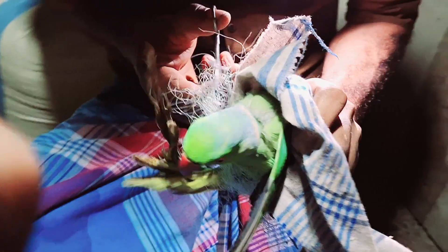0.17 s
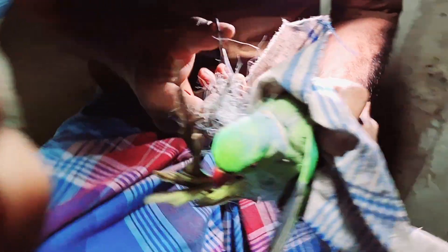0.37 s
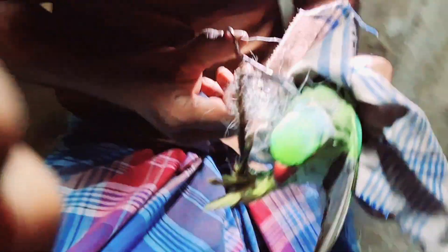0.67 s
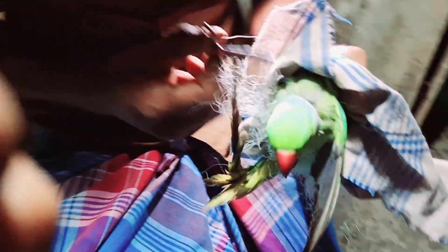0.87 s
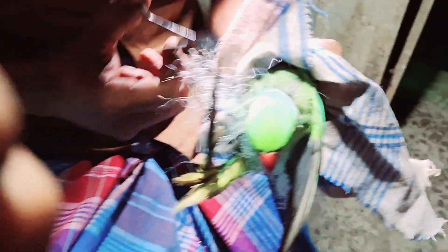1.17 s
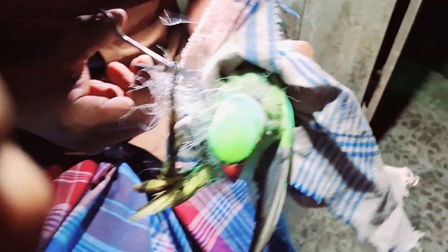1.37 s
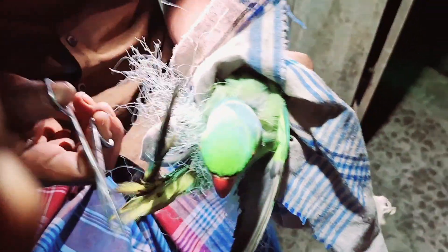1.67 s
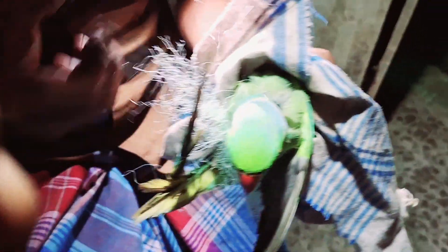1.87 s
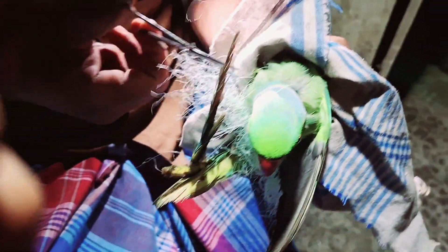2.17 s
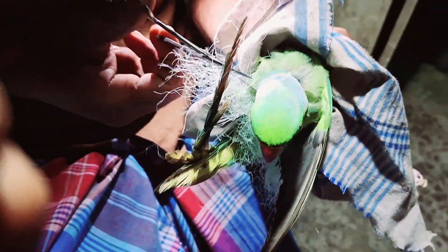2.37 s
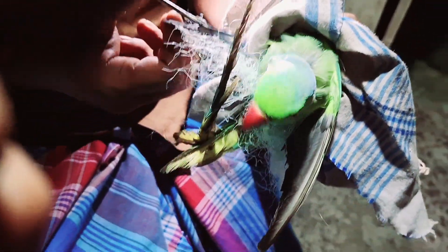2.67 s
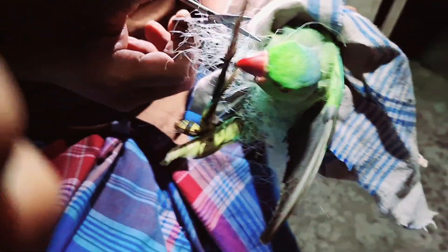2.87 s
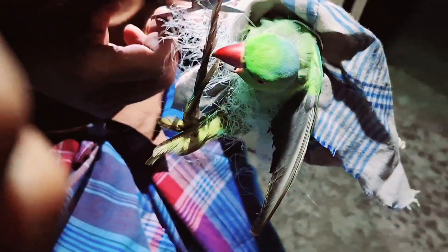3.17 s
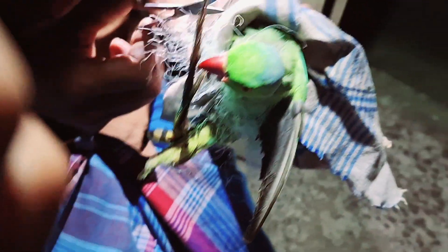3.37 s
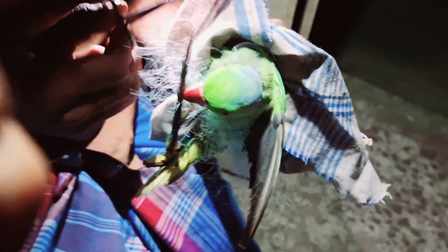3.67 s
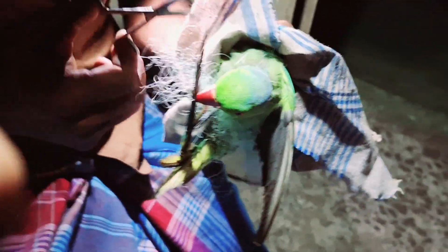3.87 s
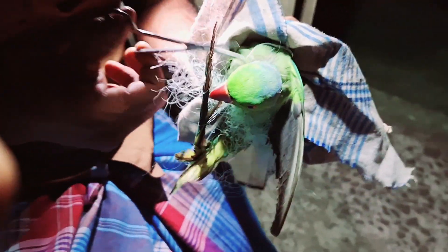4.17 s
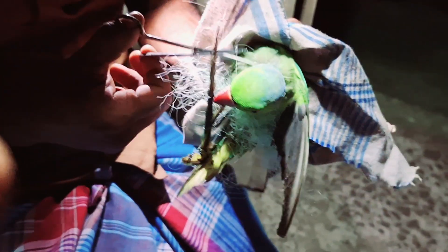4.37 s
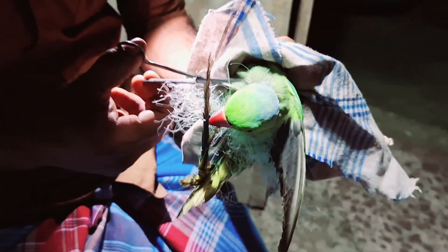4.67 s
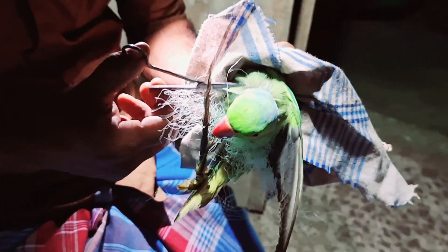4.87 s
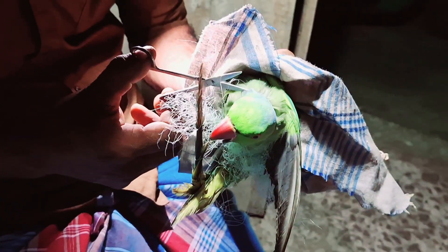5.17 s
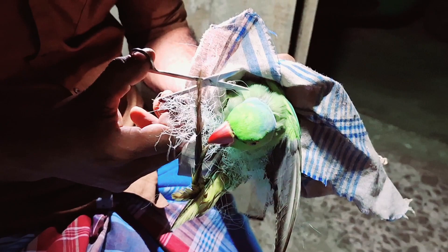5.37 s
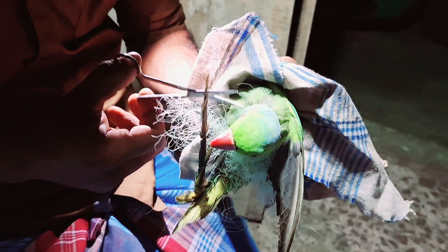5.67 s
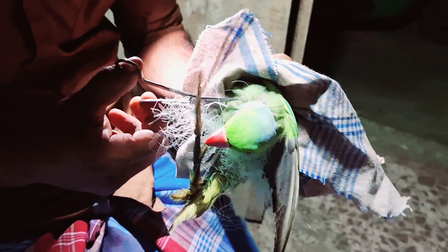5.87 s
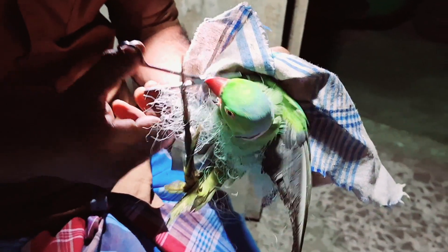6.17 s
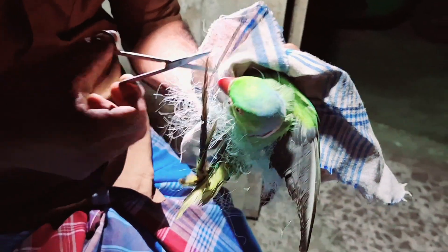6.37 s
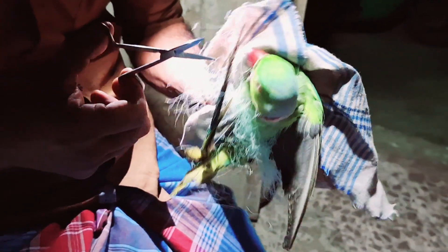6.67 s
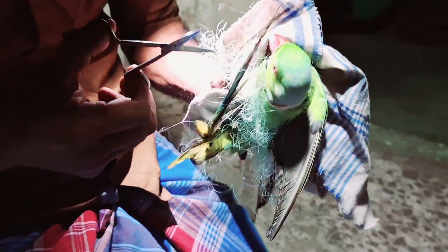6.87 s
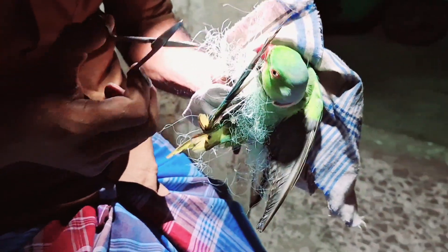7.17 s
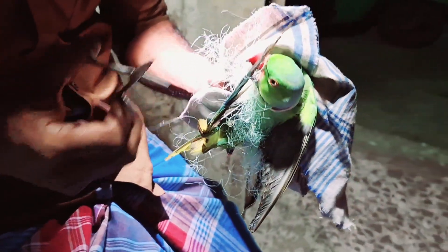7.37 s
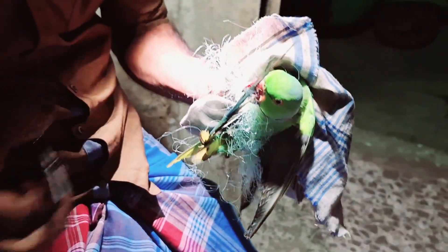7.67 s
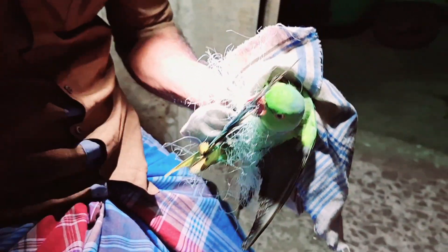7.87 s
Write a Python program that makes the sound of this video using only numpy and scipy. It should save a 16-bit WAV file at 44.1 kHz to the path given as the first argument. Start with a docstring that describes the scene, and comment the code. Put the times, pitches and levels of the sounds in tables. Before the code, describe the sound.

A hand-held parakeet screeches harshly eight times, loud and buzzing, over faint night crickets, a piping frog and a far engine.

```python
"""Outdoors at night, near walls that give a short echo, a parakeet held close to a phone screeches eight times.
Its voice organ, the syrinx, buzzes near 1 kHz in bursts of a few cycles, about 95 bursts a second.
Clicks and puffs of air make the buzz; resonances of throat and beak colour it.
Behind it are crickets (ringing bands), a piping frog (sliding sine notes), cloth rustles, low thumps and
a knock (noise ticks) and a far engine (low noise and wavering tones)."""
import sys
import numpy as np
from scipy import signal
from scipy.fft import rfft, irfft
from scipy.io import wavfile
from scipy.ndimage import uniform_filter1d, minimum_filter1d

SR = 44100
rng = np.random.default_rng(int(sys.argv[2]) if len(sys.argv) > 2 else 0)


def wav_record(signal):
    """Record a signal, one row per channel, as 16-bit PCM in the file named by sys.argv[1]."""
    frames = np.transpose(np.atleast_2d(signal))
    bounded = np.clip(frames, -1, 1)
    # unit amplitude maps onto the largest positive 16-bit level
    quanta = np.round(bounded * 32767).astype(np.int16)
    wavfile.write(sys.argv[1], SR, quanta)


def linear_from_db(decibels):
    """Turn decibels (scalar or array-like) into linear amplitude factors; 0 gives 1."""
    return 10 ** (np.asarray(decibels, float) / 20)


N = 353285
T = np.arange(N) / SR  # time in seconds

# Effort of the bird, one list a screech. Each row: time in seconds, level in dB, pitch in Hz.
SCREECH_EFFORT = [
    [(0.0, -37, 1130), (0.006, -24, 1096), (0.03, -24.5, 1045), (0.314, -26.5, 964), (0.444, -40, 897),
     (0.47, -56, 848)],
    [(2.63, -37, 930), (2.654, -28, 1062), (2.75, -28, 1048), (2.98, -28, 1006), (3.178, -37.5, 907),
     (3.235, -55, 891)],
    [(3.562, -34.5, 962), (3.626, -30, 1044), (3.77, -28, 984), (3.94, -30, 948), (4.066, -42.5, 902),
     (4.09, -55, 863)],
    [(4.43, -27.5, 927), (4.44, -39, 1035), (4.474, -28.5, 1015), (4.55, -26, 1026), (4.832, -29.5, 907),
     (4.948, -49, 822)],
    [(5.322, -28.5, 1040), (5.392, -27, 1029), (5.532, -27.5, 1027), (5.632, -25.5, 960), (5.88, -38, 926),
     (5.902, -46.5, 910)],
    [(6.138, -28, 1013), (6.174, -30.5, 1162), (6.374, -27, 1042), (6.586, -30.5, 938), (6.6, -38, 926)],
    [(6.87, -32, 996), (6.918, -29, 1100), (7.15, -26, 1026), (7.262, -28, 950), (7.346, -42.5, 876),
     (7.362, -53, 900)],
    [(7.73, -39, 1086), (7.768, -40.5, 1080), (7.774, -32.5, 1036), (7.878, -27.5, 976), (8.0, -27.5, 951),
     (8.01, -24, 945)],
]
# Timing of the bursts, one row a screech. Each row: first burst in seconds, number of gaps between bursts,
# gap in ms at the start, in the middle and at the end.
BURST_TIMING = [(.0084, 44, 10.75, 10.42, 9.9), (2.6257, 59, 10.64, 10.15, 10.09),
                (3.5662, 49, 11.4, 10.5, 10.51), (4.4313, 46, 11.07, 11.12, 11.42),
                (5.3223, 54, 11.29, 10.54, 10.71), (6.1416, 43, 10.68, 10.65, 10.43),
                (6.8728, 46, 11.02, 10.42, 10.73), (7.7297, 24, 12.02, 11.54, 11.7)]
# Head and beak pose, one row a screech. Each row: stretch of the resonances (a factor), left minus right
# in dB, open beak in dB, bright group in dB, lift of the second and of the fourth resonance in dB.
HEAD_POSE = [(.96, 8.8, -3, -3.5, -1, -5.5), (1.005, 12.6, -1, -7.5, -0.5, -0.5),
             (1.01, 8.5, -5, -7, 1.5, 0), (1, 5.4, -3.5, 0.5, 0, 1.3), (1.002, 5.25, -4, -0.5, -0.5, 0.5),
             (1.03, 5, -0.5, -3.5, 1, -1.8), (1.047, 4.7, -1, -11.5, 2, -1),
             (1.014, 6.6, -3.5, -6.5, 1, 1.3)]
# Voice, one row a screech. Each row: length of the bursts (a factor), fundamental in dB, air in dB.
VOICE_SETTINGS = [(1.08, -8.5, -7), (1.04, -6.5, -4.5), (1.07, -7.5, -9.5), (1.09, -6, -3), (1.1, -8, -2),
                  (1.2, -4.5, -3.5), (1.28, -5, -7.5), (1.1, -8, -11)]
# Resonances of the windpipe, of the throat and beak, of the hissing air and of the pumped air.
# Each row: centre in Hz, half width in Hz, level in dB within its group.
WINDPIPE_MODES = [(960, 700, 0)]
THROAT_BEAK_MODES = [(1560, 240, -0.5), (2200, 490, -5), (3165, 337, -2.46), (4106, 684, 0),
                     (4846, 886, -2.9), (6044, 730, -0.6), (7475, 714, 0)]
AIR_MODES = [(11040, 750, -1), (13000, 9800, -9.5), (16300, 2800, -2.5)]
PUMP_MODES = [(397, 171, 1)]
# Echoes off hands and cloth. Each row: delay in ms, gain at the left port, gain at the right port.
HAND_ECHOES = [(.37, 0.19, 0.17), (.7, -0.13, -0.083), (1.1, -0.13, -0.15), (1.701, 0.057, -0.12),
               (2.4, 0.013, -0.18)]
# Frog pipes. Each row: time of the swell's peak in seconds, level in dB.
FROG_PIPES = [(.8, -65), (1.12, -61), (1.54, -62), (1.87, -59), (2.19, -55), (2.551, -55), (3.301, -62),
              (4.39, -57.5), (5.19, -58.5), (5.95, -60), (6.671, -61)]
# Cloth rustles, low thumps (240 to 350 Hz) and a knock (1520 Hz). Each row: start in seconds,
# length in seconds, level in dB before fading, centre in Hz, width in Hz.
RUSTLES_AND_THUMPS = [(0.661, 0.067, -58.5, 2820, 3600), (0.896, 0.11, -58, 2300, 3500),
                      (.9, 0.083, -66, 297, 300), (1.367, .07, -59, 2300, 3000),
                      (1.37, 0.045, -67, 240, 150), (1.485, 0.088, -58, 2600, 3000),
                      (1.501, .03, -54.5, 1520, 400), (1.706, 0.0034, -60, 2000, 4000),
                      (1.701, 0.035, -65.5, 350, 200), (1.72, .4, -79, 595, 700)]
# Crickets. Each row: centre in Hz, width in Hz, average strokes per second, blur from 0 to 1,
# level in dB before the swells.
CRICKET_BANDS = [ (3810, 230, 82, .3, -66), (7700, 400, 70, .9, -77), (6180, 280, 55, 1, -69.5),
                 (13300, 1200, 240, .5, -72)]
# Colour of the night air. Each row: frequency in Hz, relative level in dB per Hz.
NIGHT_COLOUR = [(90, -35.5), (150, -18.5), (360, -20), (1000, -25), (2400, -24.5), (3800, -25), (4500, -27),
                (6000, -20), (7000, -43.5), (7700, -20.5), (9500, -51), (12000, -16.5), (15500, -22)]
# Swell of the crickets and night air together. Each row: time in seconds, change in dB.
CHORUS_SWELL = [(0, -2.5), (.6, -1), (1.3, -3), (2.1, 3.5), (2.6, 2), (3.4, -5), (4.3, -1.5), (5.1, 0),
                (6, -2.5), (6.8, -0.5), (7.6, 0), (8, 1)]
# Rise and fall of the far engine's rumble. Each row: time in seconds, relative level in dB.
ENGINE_LEVEL = [(0.0, -57), (0.64, -64.5), (1.89, -58.5), (1.92, -53), (3.19, -70), (4.44, -61),
                (4.46, -57.5), (6.56, -56.5), (6.72, -64), (7.27, -57.5), (7.61, -69), (8.01, -57)]
# Colour of that rumble. Each row: frequency in Hz, relative level in dB per Hz.
RUMBLE_COLOUR = [(25, -25), (45, 0), (70, 2.5), (110, 0.5), (150, -19.5), (300, -30), (600, -39.5)]
# Firing tone of the far engine. Each row: time in seconds, average frequency in Hz, level in dB.
FIRING_TONE = [(4.1, 37.5, -97), (4.5, 37.5, -66), (5.8, 37.66, -62.5), (6.5, 39.5, -58), (7, 41.15, -64),
               (8, 42.7, -63.5)]
# Overtones of the engine. Each row: multiple of the firing tone, average level in dB against it.
ENGINE_OVERTONES = [(1, -11), (2, 0), (3, -2)]

# random spread of the slaps: timing in cycles, pitch as a share, loudness in dB
CYCLE_JITTER, PITCH_SCATTER, SIZE_DB = .024, .014, 1.2
BURST_JITTER_MS, BURST_DB = .06, .5  # random spread from burst to burst
RISE_MS, FALL_MS = 1.163, 1.47  # swell and fade of a burst, before the voice's length factor
SAG = .033  # how fast the cycles spread out within a burst
SCOOP, SCOOP_MS = .28, 14  # share of pitch missing as a call begins, and how fast it is made up
EARLY_MS, FIRST_LATE_MS = .7, 1.5
LEAK_MS, LEAK_DB = 4.5, -8  # air that leaks before the membranes catch
RASP, PUMP_RASP = .2, .12  # share of air puffs in the buzz and in the pumped air
THROAT_DB, PUMP_DB = 5, -26  # throat group; pumped air against the fundamental
# dB lost by each group per dB of lost effort; the fundamental holds on and gives way only at the end
BEAK_SHARE, BRIGHT_SHARE, AIR_SHARE, LOW_SHARE, LOW_BEND_PER_DB = 0.68, 1.1, 1.24, 0.18, 0.015
# the treble tires during a call
BRIGHT_DB_PER_S, AIR_DB_PER_S, BEAK_DB_PER_S = -9, -1, -1.5
LEAD = 4  # samples by which the bird reaches the left port first
WALL_DB, WALL_T60_S, WALL_GAP_MS = -11, 0.19, 3.4  # echo level, time to fade by 60 dB, wait
FROG_HZ, FROG_SLIDE_HZ, FROG_MS = 3400, 49.3, 16.6  # final pitch, half the full slide, note width
NIGHT_DB = -63  # before the swells
TOP_HZ, LEFT_DB = 15800, .6  # treble limit; left minus right
CEILING, LOOK_AHEAD = .9, 131  # limiter: highest peak, samples of warning


def parakeet():
    """All calls in place; the left port is nearer the bird, so sound reaches the right port later."""
    out = np.zeros((2, N))
    for call in zip(SCREECH_EFFORT, BURST_TIMING, HEAD_POSE, VOICE_SETTINGS):
        at, both = screech(*call)
        out[:, at:at + both.shape[1]] += both
    out[1] = np.roll(out[1], LEAD)
    return out


def screech(rows, bursts, pose, voice):
    """One call: the buzz through groups of resonances; the head shades the treble of the right port."""
    s, effort_db, pitch_hz = np.transpose(rows)
    stretch, pan_db, beak_db, bright_db, second_db, fourth_db = pose
    hold, low_db, air_db = voice
    t = T[max(int((s[0] - .02) * SR), 0):int((s[-1] + .05) * SR)]
    age = t - s[0]
    peak_db = effort_db.max()
    lost = peak_db - np.interp(t, s, effort_db)

    slaps, puffs = syrinx(t, s, pitch_hz, bursts, hold)
    leaking = np.abs(age + LEAK_MS / 2000) < LEAK_MS / 2000
    leak = leaking * rng.standard_normal(len(t)) * np.std(slaps) * linear_from_db(LEAK_DB)
    buzz = slaps + RASP * puffs[0] + leak

    lift = (0, second_db, 0, fourth_db, 0, 0, 0)
    tract = [(hz * stretch, w, db + up) for (hz, w, db), up in zip(THROAT_BEAK_MODES, lift)]
    # each group moves with effort and age
    low_db = peak_db + low_db - LOW_SHARE * lost - LOW_BEND_PER_DB * lost ** 2
    beak_db = peak_db + beak_db - BEAK_SHARE * lost + BEAK_DB_PER_S * age
    bright_db = peak_db + bright_db - BRIGHT_SHARE * lost + BRIGHT_DB_PER_S * age
    air_db = peak_db + air_db - AIR_SHARE * lost + AIR_DB_PER_S * age

    # little sounds under the fundamental but the air pumped by each burst
    low = resonances(slaps, WINDPIPE_MODES, low_db) - resonances(buzz, tract[:3], beak_db)
    low = signal.sosfiltfilt(signal.butter(5, 630, "high", fs=SR, output="sos"), low)
    low = low + resonances(slaps + PUMP_RASP * puffs[1], PUMP_MODES, low_db + PUMP_DB)
    throat = resonances(buzz, tract[3:6], peak_db + THROAT_DB - lost)
    high = throat - resonances(buzz, tract[6:], bright_db)
    # the topmost hiss is turbulence, partly unrelated at the two ports
    air = resonances(slaps + .9 * puffs, AIR_MODES, air_db)
    pan = linear_from_db(np.array([[pan_db], [-pan_db]]) / 2)
    return int(round(t[0] * SR)), low + pan * high + air


def syrinx(t, s, pitch_hz, bursts, hold):
    """Membrane slaps: each burst swells and dies within a few cycles; a puff of air rides each slap."""
    centre = burst_times(*bursts)
    cycle = np.arange(-4, 7)
    chance = rng.standard_normal((len(centre), 4 + 2 * len(cycle)))
    pitch_luck, cycle_luck, time_luck, loud_luck = chance[:, :4].T[:, :, None]
    wobble, size = np.split(chance[:, 4:], 2, axis=1)
    # the voice scoops up as the membranes tighten, unless the call is already under way
    slack = SCOOP * np.exp((s[0] - centre) * 1000 / SCOOP_MS) * (s[0] > 0)
    hz = np.interp(centre, s, pitch_hz) * (1 - slack)
    period = (1 + PITCH_SCATTER * pitch_luck) / hz[:, None]
    # the pitch sags within a burst, which widens every overtone
    late = (cycle + SAG * cycle ** 2 + 0.13 * cycle_luck + CYCLE_JITTER * wobble) * period
    swell_ms = hold * np.where(late < 0, RISE_MS, FALL_MS)
    shape = np.exp(-.5 * np.abs(late * 1000 / swell_ms) ** 2.4)
    # slack membranes slap more softly
    shape = shape * linear_from_db(-25 * slack[:, None] + BURST_DB * loud_luck)
    strength = (shape * linear_from_db(SIZE_DB * size)).ravel()
    start = centre[:, None] - t[0] + (BURST_JITTER_MS * time_luck - EARLY_MS) / 1000

    # place each click between samples with a short smooth pulse
    at = (start + late).ravel() * SR
    tap = np.floor(at)[:, None] + np.arange(-7, 9)
    away = tap - at[:, None]
    click = np.sinc(away) * np.cos(np.pi * away / 16) ** 2
    slaps = np.zeros(len(t))
    np.add.at(slaps, np.clip(tap, 0, len(t) - 1).astype(int), click * strength[:, None])
    puffs = uniform_filter1d(np.abs(slaps), size=30) * rng.standard_normal((2, len(t)))
    return slaps, level(puffs, 0) * np.std(slaps)


def burst_times(first, gaps, *gap_ms):
    """The gap between bursts drifts smoothly; the first burst of a fresh call comes a little late."""
    gap = np.polyfit([0, gaps / 2, gaps], gap_ms, deg=len(gap_ms) - 1)
    k = np.arange(gaps + 1)
    late_ms = FIRST_LATE_MS * (k == 0) * (first > .1)
    return first + (np.polyval(np.polyint(gap), k) + late_ms) / 1000


def resonances(x, modes, db):
    """Resonances side by side with alternating sign, at a level that may move."""
    y = 0
    for k, (hz, half, mode_db) in enumerate(modes):
        y = y + (-1) ** k * linear_from_db(mode_db) * ring(ring(x, hz, 2 * half), hz, 2 * half)
    return level(y, 0) * linear_from_db(db)


def hands(bird):
    """Close echoes smear each slap and cut fixed notches, different at each port."""
    out = bird
    for ms, left, right in HAND_ECHOES:
        out = out + np.array([[left], [right]]) * np.roll(bird, int(ms * SR / 1000), axis=1)
    return out


def walls(bird):
    """A short scatter of echoes that dies away, different at each port."""
    t = np.arange(int(.5 * SR)) / SR
    tail = rng.standard_normal((2, len(t))) * linear_from_db(-60 * t / WALL_T60_S) * (t > WALL_GAP_MS / 1000)
    tail = ring(ring(tail, 3200, 7000), 3200, 7000)
    tail = tail / np.sqrt(np.sum(tail ** 2, axis=1, keepdims=True))
    mono = bird.mean(axis=0, keepdims=True)
    return linear_from_db(WALL_DB) * signal.fftconvolve(mono, tail, axes=1)[:, :N]


def frog():
    """Short pure notes that slide up, level off and end in a fainter pulse."""
    out = np.zeros(N)
    for s, db in FROG_PIPES:
        t = (T - s) * 1000 / FROG_MS
        hz = FROG_HZ + FROG_SLIDE_HZ * (np.tanh(t + 1.1) - 1)
        swell = np.exp(-.5 * t ** 2) + 0.23 * np.exp(-.5 * (t - 2.2) ** 2)
        out += linear_from_db(db) * swell * np.sin(2 * np.pi * np.cumsum(hz) / SR)
    return out


def rustles_and_thumps():
    """Dense noise ticks of uneven size, swelling and fading: cloth rustles, low thumps and a knock."""
    out = 0
    for s, length, db, hz, width in RUSTLES_AND_THUMPS:
        size_db = 3.5 * np.minimum(rng.exponential(size=N), 4)
        ticks = rng.standard_normal((3, N)) * linear_from_db(size_db)
        # one shared noise plus one of its own for each port
        ticks = level(ring(ticks[0] + .8 * ticks[1:], hz, width), db)
        u = np.clip((T - s) / length, 0, None)
        out = out + ticks * (1 - np.exp(-u / 0.065)) * np.exp(-u ** 2)
    return out


def crickets():
    """Wing strokes ring a narrow band; many unseen insects blur each band with noise."""
    out = 0
    for hz, width, rate, blur, db in CRICKET_BANDS:
        drift = 1 + 0.016 * np.array([walk(9.0), walk(5.5)])
        strokes = np.cumsum(rate * drift, axis=1) / SR
        clicks = np.diff(np.floor(strokes), prepend=0, axis=1)
        push = level(clicks, 0) * (1 - blur) + blur * rng.standard_normal((2, N))
        out = out + level(ring(ring(push, hz, width), hz, width), db) * linear_from_db(2.2 * walk(4))
    return out


def night_air():
    """Coloured noise whose level wanders a little."""
    return level(coloured(NIGHT_COLOUR), NIGHT_DB) * linear_from_db(1.3 * walk(4.5))


def engine():
    """Low rumble with wavering firing tones, nearly the same at both ports."""
    noise = coloured(RUMBLE_COLOUR, channels=3)
    rumble = linear_from_db(np.interp(T, *np.transpose(ENGINE_LEVEL)) - 2.0) * (noise[0] + .48 * noise[1:])
    s, hz, db = np.transpose(FIRING_TONE)
    turns = np.cumsum(np.interp(T, s, hz) * (1 + 0.014 * walk(2.0))) / SR
    tones = 0
    for multiple, tone_db in ENGINE_OVERTONES:
        tones = tones + linear_from_db(tone_db + 3.5 * walk(2.7)) * np.sin(2 * np.pi * multiple * turns)
    return rumble + linear_from_db(np.interp(T, s, db)) * tones


def level(x, db):
    """Scale to an rms (average power) level; x at rms 1 is 0 dB."""
    return x * linear_from_db(db) / np.sqrt(np.mean(x ** 2))


def ring(x, hz, width):
    """One resonance, gain 1 at the centre."""
    return signal.lfilter(*signal.iirpeak(hz, hz / width, fs=SR), x)


def coloured(shape, channels=2):
    """Unrelated noises with a spectrum of (Hz, dB) points."""
    hz, db = np.transpose(shape)
    f = np.maximum(np.fft.rfftfreq(N, 1 / SR), 1)
    gain = linear_from_db(np.interp(np.log(f), np.log(hz), db))
    return level(irfft(rfft(rng.standard_normal((channels, N))) * gain, N), 0)


def walk(rate):
    """Random levels, each held for 1 / rate seconds, then smoothed twice."""
    k = int(SR / rate)
    steps = np.repeat(rng.standard_normal(N // k + 1), k)
    return uniform_filter1d(uniform_filter1d(steps, k), k)[:N]


def scene():
    """Bird and its echo over the night."""
    bird = hands(parakeet())
    swell = linear_from_db(np.interp(T, *np.transpose(CHORUS_SWELL)))
    night = (crickets() + night_air()) * swell
    return bird + walls(bird) + night + frog() + rustles_and_thumps() + engine()


def band_limit(x):
    """A steep low-pass at the top of the band."""
    return signal.sosfilt(signal.butter(12, 16480, fs=SR, output="sos"), x)


def record(dry):
    """The phone cuts the top, and a limiter turns down any peaks above its ceiling."""
    x = signal.sosfilt(signal.ellip(8, .2, 70, TOP_HZ, fs=SR, output="sos"), dry)
    x = x * linear_from_db(np.array([[LEFT_DB], [-LEFT_DB]]) / 2)
    peak = np.abs(x).max(axis=0) + 1e-9
    gain = minimum_filter1d(np.minimum(1, CEILING / peak), size=2 * LOOK_AHEAD)
    mix = x * uniform_filter1d(gain, size=LOOK_AHEAD)
    return band_limit(mix)


dry = scene()
out = record(dry)
wav_record(out)
```